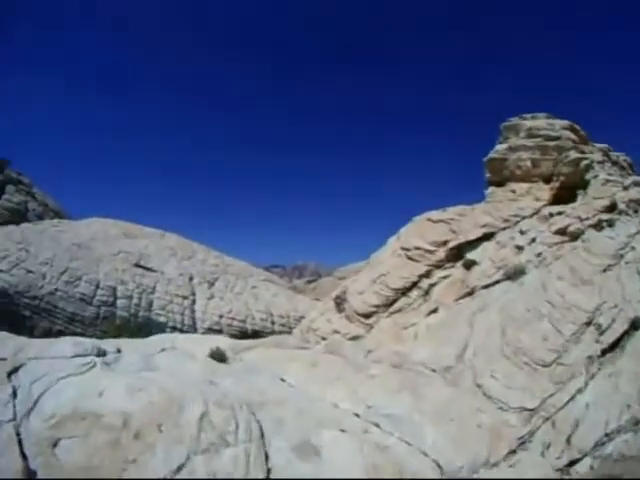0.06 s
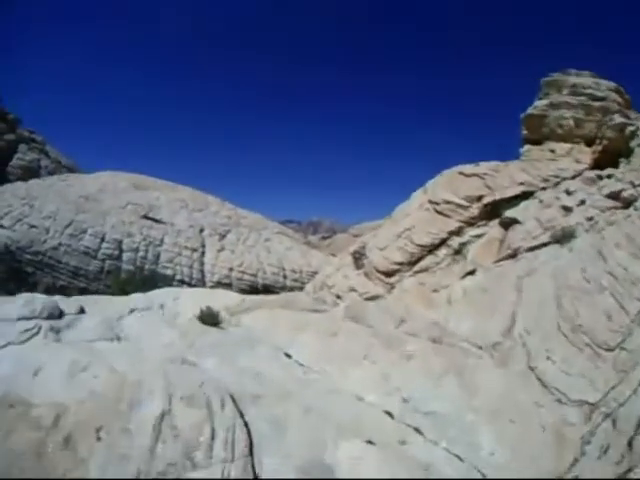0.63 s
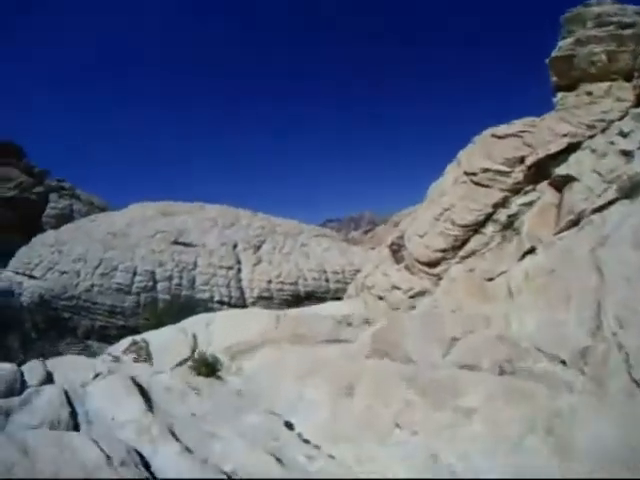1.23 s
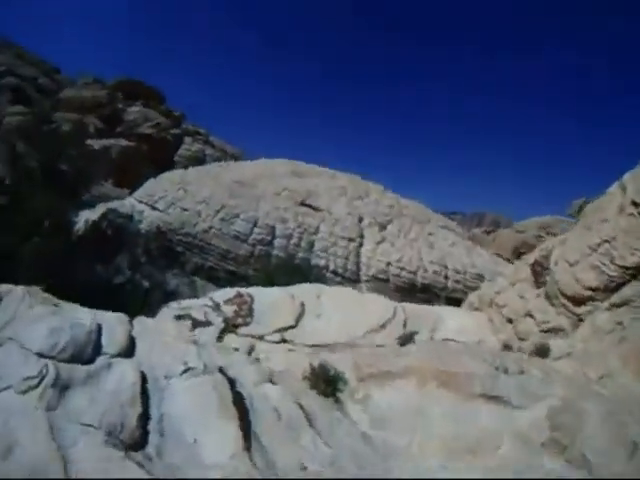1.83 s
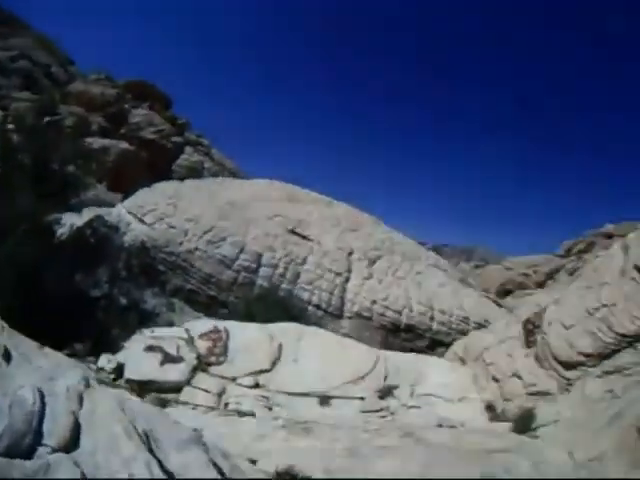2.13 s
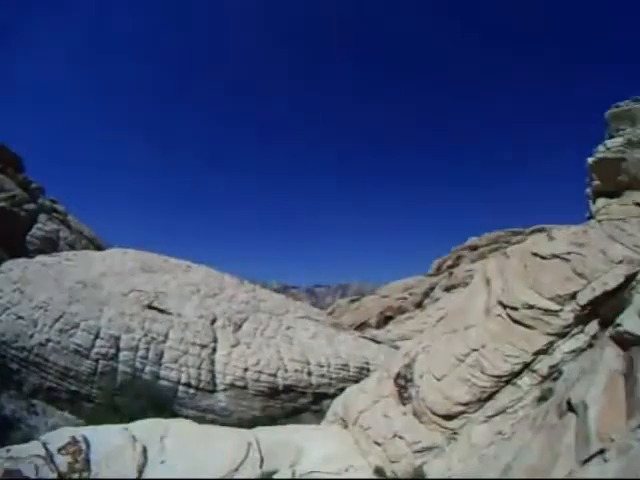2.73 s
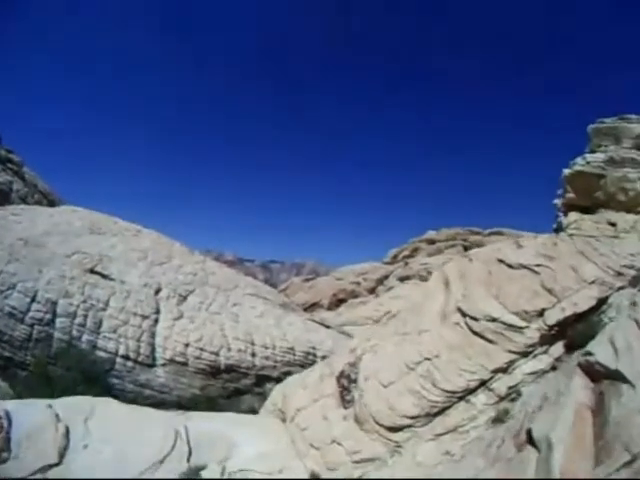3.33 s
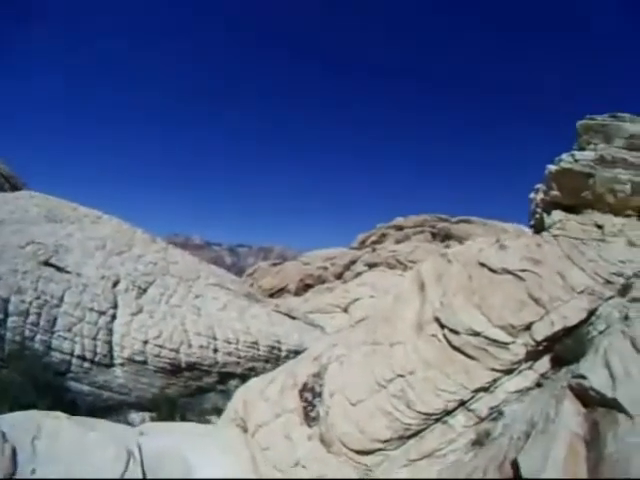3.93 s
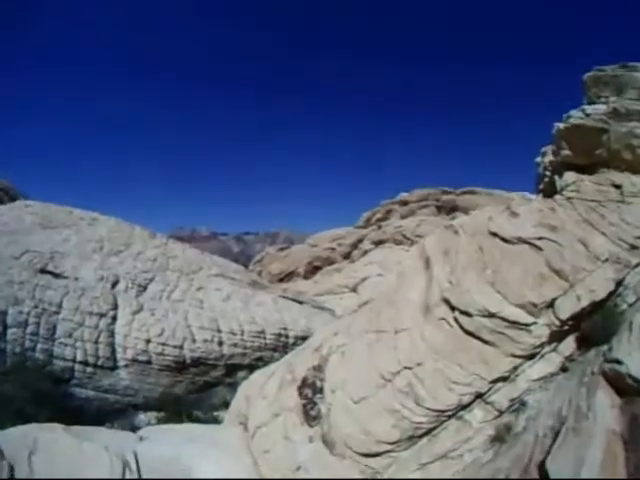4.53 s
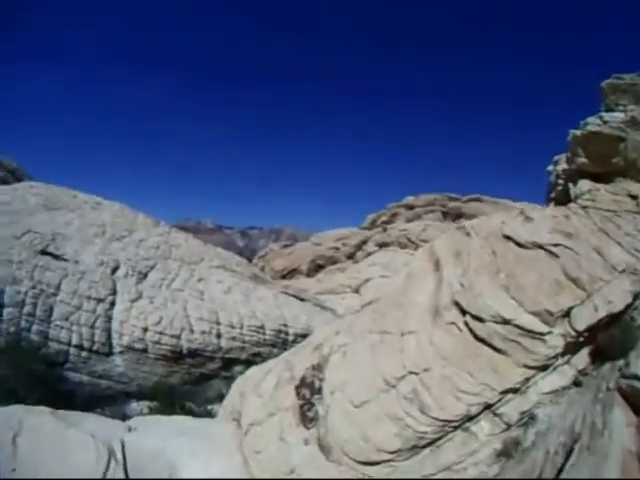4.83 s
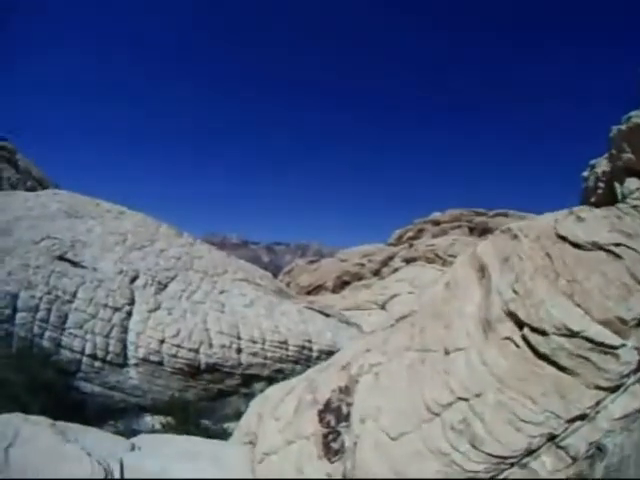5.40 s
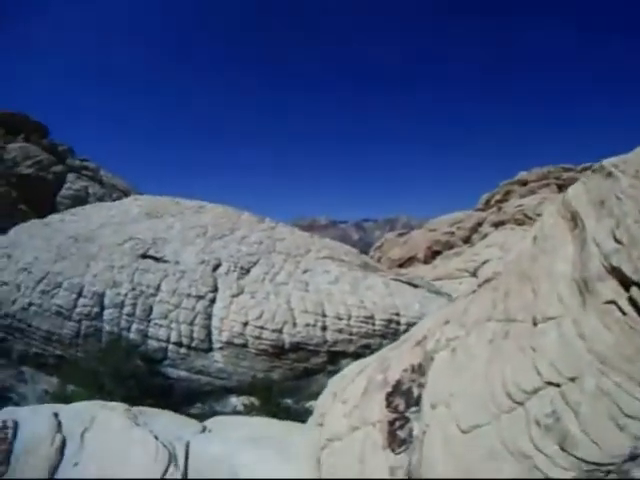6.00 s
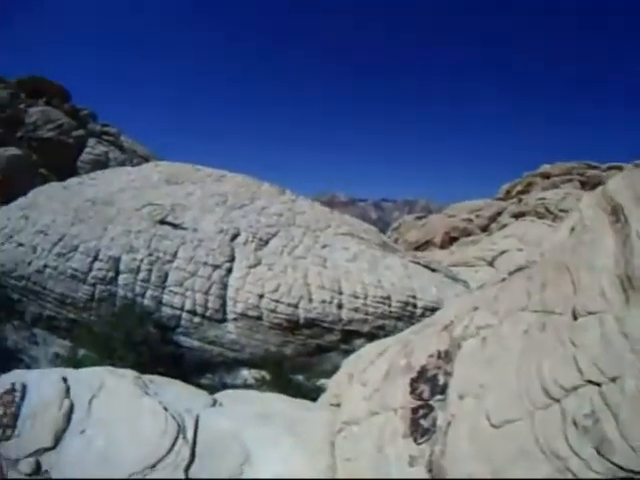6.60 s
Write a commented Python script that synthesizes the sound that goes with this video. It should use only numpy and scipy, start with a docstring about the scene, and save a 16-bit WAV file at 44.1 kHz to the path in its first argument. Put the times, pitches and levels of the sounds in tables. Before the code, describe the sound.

Dull footstep thumps and scratchy, gritty crunches on bare rock, with low handheld microphone rumble and faint hiss.

```python
"""Deep thumps, a low rumble and short, scratchy chirps like crunching grit, over faint air and hiss.
A hiker walks over bare rock with a small camera in hand. Each footfall reaches the camera through the
body as a thump, and in between the grip rumbles. The camera's coarse 8 kHz converter, which turns
sound into numbers, adds hiss and chatters in chirps."""
import sys
import numpy as np
from scipy.fft import rfft, irfft, next_fast_len
from scipy.io import wavfile
from scipy.ndimage import map_coordinates

SR = 44100
rng = np.random.default_rng(int(sys.argv[2]) if len(sys.argv) > 2 else 0)


def unload_audio(sound):
    """Save the sound as a 16-bit wav file, at the path given as the first command line argument."""
    columns = np.transpose(np.atleast_2d(sound))
    # keep every value between -1 and 1, then stretch to whole-number steps
    steps = np.round(np.clip(columns, -1, 1) * 32767)
    wavfile.write(sys.argv[1], SR, steps.astype(np.int16))


N = 293485

# footfalls shaking the camera: (time [s], peak level [dB], sway [Hz], swell time [s], rough noise [dB])
FOOTFALLS = [(0.107, -41.5, 27.5, 0.011, -67), (0.140, -39.5, 14.9, 0.05, -74.5),
             (0.607, -37, 41, 0.006, -63), (0.647, -30, 21, 0.033, -64.5), (1.160, -37, 28.3, .014, -68),
             (2.060, -43, 12.4, 0.043, -79), (2.178, -42, 21.2, 0.028, -80.5),
             (2.280, -43, 11.5, 0.042, -74), (2.868, -31.5, 21, .040, -63),
             (3.630, -41.5, 12.3, 0.049, -71.5), (3.715, -38.5, 16.8, 0.023, -72),
             (4.379, -21.5, 22.3, 0.027, -52.5), (5.387, -39.5, 23, 0.017, -63),
             (5.996, -36, 31, .012, -66), (6.066, -42, 21.6, 0.024, -72.5)]


def amp(db):
    """Turn decibels into a gain, the number a sound is multiplied by."""
    return 10 ** (np.asarray(db) / 20)


def filtered(x, response):
    """Turn each frequency in x up or down by the gain response(hz)."""
    size = next_fast_len(N + 8192)
    return irfft(rfft(x, size) * response(np.fft.rfftfreq(size, 1 / SR)), size)[:N]


def noise(spectrum):
    """Noise of average strength (rms) 1, coloured by rows of (frequency [Hz], relative level [dB])."""
    points_hz, db = np.transpose(spectrum)
    white = rng.standard_normal(N)
    coloured = filtered(white, lambda hz: amp(np.interp(np.log(hz + 1), np.log(points_hz), db)))
    return coloured / np.std(coloured)


def wobble(per_second):
    """A smooth curve through this many random values a second."""
    values = rng.standard_normal(int(N * per_second / SR) + 4)
    return map_coordinates(values, [np.arange(N) * per_second / SR])


def add(track, start_s, sound):
    """Mix a sound into the track from start_s on."""
    part = track[max(0, round(start_s * SR)):][:len(sound)]
    part += sound[:len(part)]


def breeze(flutter_db=2):
    """Moving air makes a faint, hollow murmur that swells and flutters."""
    # slow swells of the air: (time [s], level [dB])
    swells = [(0, -80.5), (.8, -76), (1.25, -71.5), (2.0, -77.5), (3.3, -77), (4.5, -75.5), (5.8, -77.5),
              (6.2, -72), (6.65, -74.5)]
    # colour of the murmur: (frequency [Hz], relative level [dB])
    colour = [(50, -4.5), (120, -1.5), (180, 2), (245, -8), (450, -21.5), (1000, -44)]
    times, db = np.transpose(swells)
    loudness = amp(np.interp(np.arange(N) / SR, times, db))
    return loudness * amp(flutter_db * wobble(9)) * noise(colour)


def microphone_hiss(level_db=-74):
    """The microphone hisses evenly."""
    # colour of the hiss: (frequency [Hz], relative level [dB])
    colour = [(60, 6), (300, 5), (800, -1.5), (2000, -2.5), (3300, 0.5), (4000, -8), (4500, -49.5)]
    return amp(level_db) * noise(colour)


def hand_motion(rest_db=-67, turn_db=-53.5, jolt_db=-54):
    """How much the hand moves, as a gain: a resting tremor, one slow turn and a jolt at each footfall."""
    turn_middle_s, turn_width_s = 1.95, .55
    rise_s, settle_s, firm_step_db = .05, .26, -36
    t = np.arange(N) / SR
    turn = amp(turn_db) * np.exp(-((t - turn_middle_s) / turn_width_s) ** 2 / 2)
    power = amp(rest_db) ** 2 + turn ** 2
    for start, step_db, *_ in FOOTFALLS:
        peak = amp(jolt_db + .15 * (step_db - firm_step_db))  # harder steps jolt only a little more
        envelope = np.exp(-np.maximum((start - t) / rise_s, (t - start) / settle_s))
        power += (peak * envelope) ** 2
    return np.sqrt(power)


def grip_rumble(motion):
    """The grip on the camera rumbles, louder the more the hand moves."""
    # colour of the rumble: (frequency [Hz], relative level [dB])
    colour = [(6, -15), (14, 1), (24, -1.5), (42, -7), (62, -17), (100, -23), (200, -32.5), (500, -65)]
    return motion * noise(colour)


def faint_ticks(motion, per_second=3.9, length_s=.0009, pulse_hz=2398, scatter_hz=698):
    """Rows for tiny random chirps, heard as ticks, that come more often when the hand moves more."""
    count = round(per_second * N / SR)
    place, size, pitch = rng.uniform(size=(count, 3)).T
    motion_so_far = np.cumsum(motion) / motion.sum()
    times = np.searchsorted(motion_so_far, (np.arange(count) + place) / count) / SR
    return list(zip(times, length_s * (.5 + size), pulse_hz + scatter_hz * (2 * pitch - 1)))


def converter_chatter(motion, level_db=-34.5, edge_hz=3600, cutoff_hz=3920):
    """The converter idles in equal pulses; it chirps when their rate dives, warbles and climbs back."""
    # dives of the pulse rate: (time [s], length [s], pulse rate at the bottom [Hz])
    chirps = [(.014, 0.026, 1091), (.053, 0.0082, 1300), (.222, 0.0019, 1516), (.348, 0.0043, 900),
              (.522, .004, 1192), (.555, 0.015, 1005), (.571, 0.0082, 705), (.749, .002, 1880),
              (.944, 0.0031, 1100), (1.030, 0.0083, 799), (1.076, 0.0057, 701), (1.088, .004, 1089),
              (1.096, 0.0047, 503), (1.146, 0.0076, 995), (1.241, 0.0087, 1690), (1.277, 0.0026, 905),
              (1.491, .002, 1489), (1.668, .002, 2000), (1.758, .012, 3000), (1.770, .013, 1199),
              (1.799, 0.0047, 702), (1.910, .0025, 1510), (2.041, .002, 2000), (2.162, 0.003, 2690),
              (2.278, 0.0049, 1900), (2.469, 0.0064, 399.3), (2.562, .002, 1701), (2.614, 0.0039, 900),
              (2.648, 0.0028, 1600), (2.686, .004, 499), (2.743, .003, 1709), (2.798, 0.0098, 1990),
              (2.834, 0.0045, 700), (2.980, 0.0031, 1503), (3.072, 0.0023, 899), (3.087, 0.0024, 1497),
              (3.142, 0.0039, 399.3), (3.168, 0.0037, 1498), (3.214, 0.0082, 699), (3.295, 0.012, 2200),
              (3.314, 0.0053, 500), (3.457, 0.0059, 899), (3.473, .005, 400.3), (3.498, .013, 1002),
              (3.548, 0.004, 1903), (3.576, 0.0067, 1487), (3.741, .002, 1300), (3.868, .004, 1403),
              (3.918, 0.0039, 1003), (3.999, 0.01, 900), (4.012, 0.0086, 2300), (4.032, .010, 1100),
              (4.048, 0.0069, 1394), (4.068, 0.012, 2112), (4.080, 0.012, 1298), (4.092, 0.011, 2087),
              (4.158, 0.013, 1400), (4.277, .009, 1100), (4.286, .011, 2504), (4.297, 0.0078, 701),
              (4.4, .012, 298), (4.429, 0.0058, 200), (4.462, 0.0079, 1705), (4.605, 0.0067, 1400),
              (4.648, 0.0028, 2890), (4.660, .0035, 500.5), (4.81, .025, 1100), (4.853, 0.0044, 400),
              (4.930, 0.03, 1104), (5.012, 0.022, 2312), (5.132, .014, 898), (5.177, 0.012, 902),
              (5.199, 0.0063, 901), (5.211, .038, 900), (5.250, .010, 2580), (5.260, .011, 1494),
              (5.271, 0.0058, 900), (5.321, 0.0059, 399), (5.347, 0.0069, 2006), (5.357, .007, 199),
              (5.368, .0045, 1199), (5.453, 0.01, 900), (5.464, .008, 2800), (5.476, .007, 898),
              (5.610, 0.0032, 1199), (5.746, .006, 400), (5.771, 0.0041, 1688), (5.824, 0.0026, 1299),
              (5.893, 0.0042, 701), (5.966, .011, 804), (6.268, 0.0084, 600), (6.275, 0.016, 1605),
              (6.309, .011, 600), (6.319, .014, 1902), (6.336, .007, 1600), (6.373, 0.0085, 1404),
              (6.383, 0.026, 1400), (6.635, 0.0034, 3220)]
    idle_hz, longest_sweep_s, roundness = SR / 8, .007, 1.25  # roundness 1 gives a sharp bend
    warble_hz = 480.8 * wobble(per_second=380)  # strongest in long chirps
    jitter_hz = 220.4 * wobble(per_second=1500)  # roughens every chirp
    t = np.arange(N) / SR
    rate = np.full(N, idle_hz)
    for start, length, bottom_hz in chirps + faint_ticks(motion):
        near = slice(max(0, round((start - length) * SR)), round((start + 2 * length) * SR))
        inside_s = np.minimum(t[near] - start, start + length - t[near])  # negative outside the chirp
        sweep_s = min(longest_sweep_s, length / 2)
        height = np.clip(1 - inside_s / sweep_s, 0, None) ** roundness
        glide = bottom_hz + (edge_hz - bottom_hz) * height
        dive = np.abs(glide + warble_hz[near] * sweep_s / longest_sweep_s + jitter_hz[near])
        dive += idle_hz * np.maximum(-inside_s, 0) / .001  # outside, back to idling within 1 ms
        rate[near] = np.minimum(rate[near], dive)
    # a pulse fires each time a running total passes a whole number
    pulses = np.diff(np.floor(np.cumsum(rate) / SR), prepend=0)
    pulses -= rate / SR  # the converter cancels their average
    # its filter hides the fast idle rate, so only the dives are heard
    return amp(level_db) * filtered(pulses, lambda hz: 1 / (1 + (hz / cutoff_hz) ** 20))


def footfalls():
    """Each step sways the camera until the arm damps it; a dull, rough noise swells and fades with it."""
    # colour of the thump's rough noise: (frequency [Hz], relative level [dB])
    rough_colour = [(30, -2.5), (70, 0.5), (115, 4.5), (170, -8), (280, -20), (480, -15), (1000, -24),
                    (3000, -39.5)]
    sway, rough_gain = np.zeros(N), np.zeros(N)
    t = np.arange(SR // 4) / SR
    for start, step_db, sway_hz, swell_s, rough_db in FOOTFALLS:
        envelope = t / swell_s * np.exp((1 - (t / swell_s) ** 2) / 2)  # rises to 1, then dies away
        add(sway, start, amp(step_db) * envelope * np.sin(2 * np.pi * sway_hz * t))
        add(rough_gain, start, amp(rough_db) * envelope)
    return sway + rough_gain * noise(rough_colour)


def scene():
    """Steps, grip, air, hiss and chatter, mixed into one channel."""
    motion = hand_motion()
    sound = footfalls() + grip_rumble(motion) + breeze() + microphone_hiss()
    return (sound + converter_chatter(motion))[None]


def record(dry):
    """The converter rounds the sound coarsely; straight lines between its samples add mirrored treble."""
    converter_hz, rounding_step, top_hz = 8000, 1 / 2048, 15500
    sample_times = np.arange(0, N / SR, 1 / converter_hz)
    samples = map_coordinates(dry[0], [sample_times * SR])
    rounded = rounding_step * np.round(samples / rounding_step)
    joined = np.interp(np.arange(N) / SR, sample_times, rounded)
    storage_hiss = rng.standard_normal(N) / (32768 * np.sqrt(6))  # the faint hiss of 16-bit storage
    return filtered(joined + storage_hiss, lambda hz: hz < top_hz)[None]


dry = scene()
out = record(dry)
unload_audio(out)
```